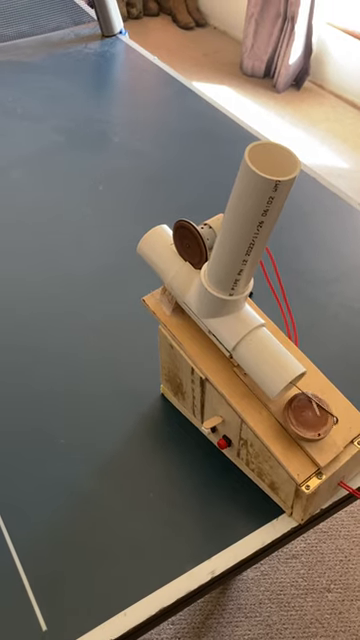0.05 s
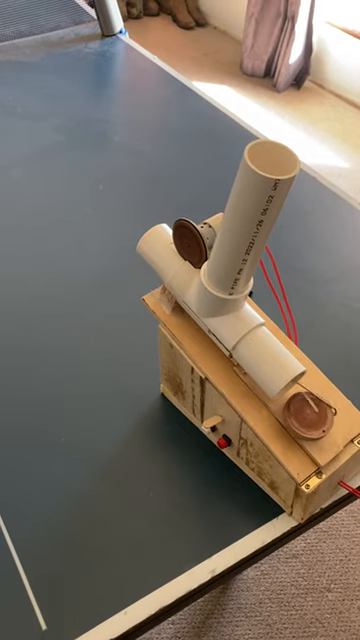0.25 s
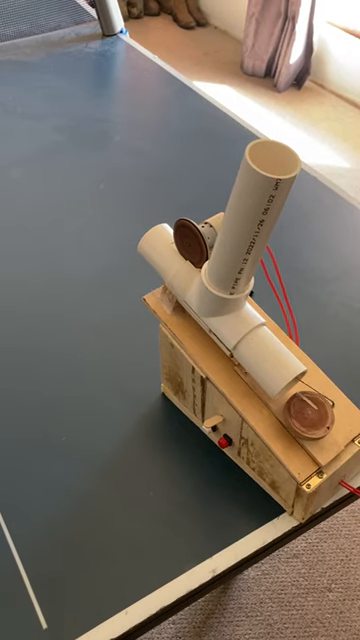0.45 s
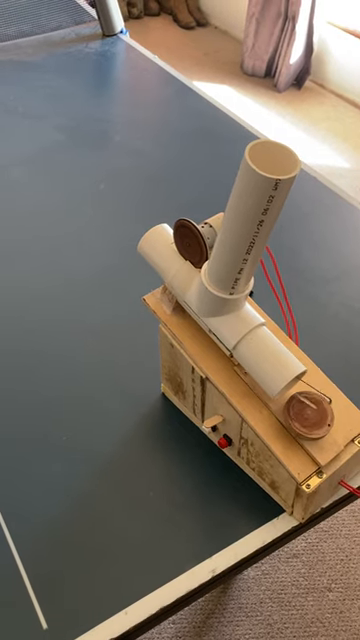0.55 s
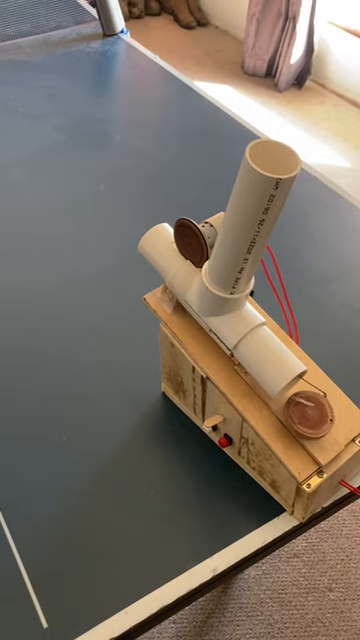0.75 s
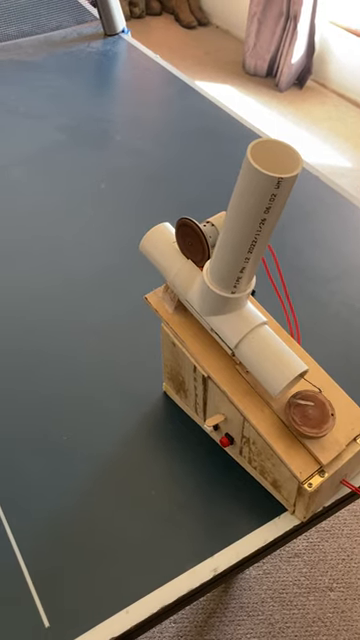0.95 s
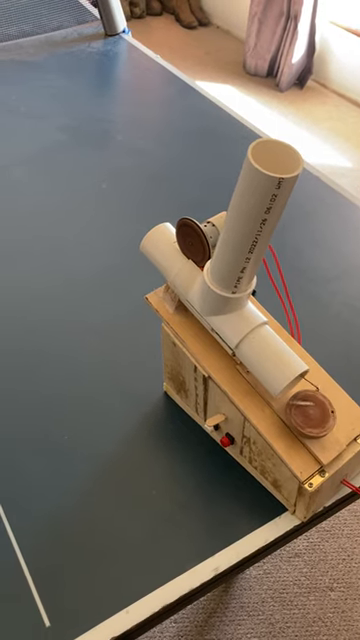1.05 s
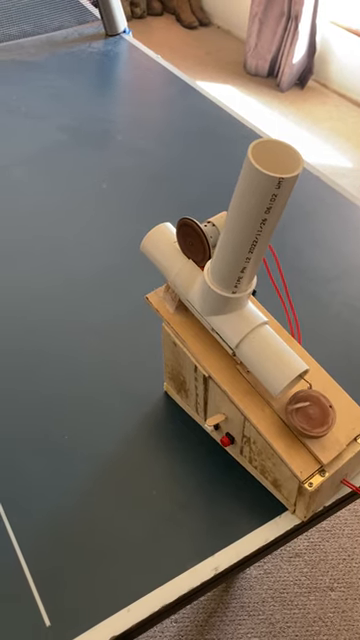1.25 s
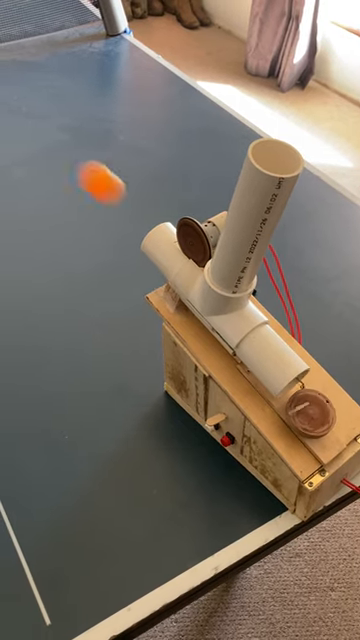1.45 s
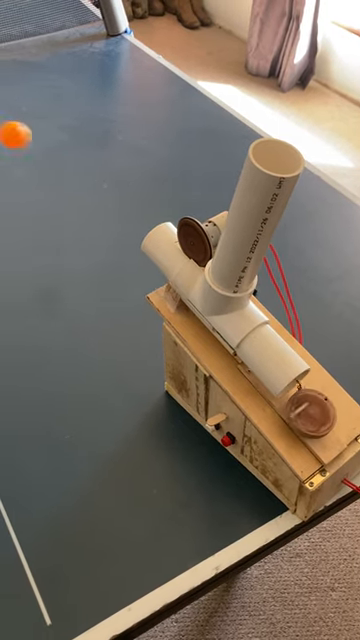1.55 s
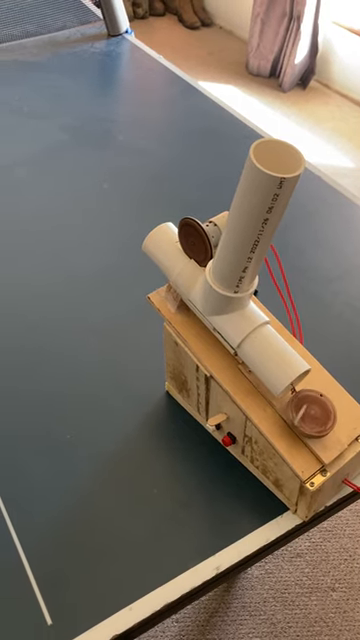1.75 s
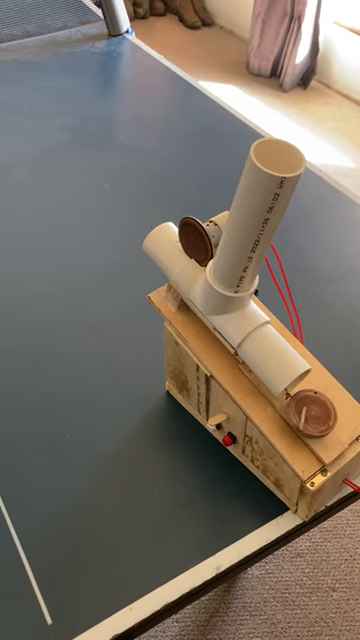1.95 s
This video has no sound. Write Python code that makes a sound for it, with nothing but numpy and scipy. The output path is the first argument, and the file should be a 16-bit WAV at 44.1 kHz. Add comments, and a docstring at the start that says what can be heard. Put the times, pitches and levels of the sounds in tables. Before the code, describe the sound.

A small ball launcher's motor hums and whines, then a ball pops out and bounces.

```python
"""At a table-tennis table, close to a small home-made ball launcher. Its unbalanced wheel drives a hum
in the wooden box; the motor whines at multiples of the shaft rate over a rushing noise. A ball bouncing
about the room makes wooden knocks and light ticks. Another is fired with a pop that slows the wheel, and
bounces once on the table. The impacts ring on in the room; a phone's two microphone ports pick it up."""
import sys
import numpy as np
from scipy import signal
from scipy.fft import rfft, irfft, next_fast_len
from scipy.io import wavfile

SR = 44100
rng = np.random.default_rng(int(sys.argv[2]) if len(sys.argv) > 2 else 0)


def master(y):
    """Save y as 16-bit WAV."""
    cut = np.clip(np.atleast_2d(y).T, -1, 1)
    pcm = np.round(cut * 32767)  # scale
    wavfile.write(sys.argv[1], SR, pcm.astype(np.int16))


N = 88200

# table-top modes: f/Hz, width/Hz, relative level/dB
TABLE_MODES = [(290, 82, -1), (405, 75, -2), (537, 64, -5), (785, 110, -6.5), (1044, 185, -9.5),
               (1680, 120, -3)]
# decay of struck wood: f/Hz, t60/s
WOOD_DECAY = [(200, 0.39), (1000, 0.43), (2500, 0.3)]
SIDE = np.array([[.5], [-.5]])  # left and right share of a difference


def amp(db):
    return 10 ** (np.asarray(db) / 20)


def unit_rms(x):
    return x / np.sqrt(np.mean(x ** 2) + 1e-20)


def along(points, hz):
    """Interpolate (f/Hz, value) points on a log axis."""
    f, values = np.transpose(points)
    return np.interp(np.log(hz + 1), np.log(f + 1), values)


def filtered(x, response):
    """Apply a complex frequency response."""
    size = next_fast_len(x.shape[-1] + SR // 2)
    return irfft(rfft(x, size) * response(np.fft.rfftfreq(size, 1 / SR)), size)[..., :x.shape[-1]]


def resonances(modes):
    """Causal response of modes (f/Hz, width/Hz, level/dB), alternating in sign."""
    return lambda f: sum((-1) ** k * amp(db) * 1j * f * width / (hz * hz - f * f + 1j * f * width)
                         for k, (hz, width, db) in enumerate(modes))


def noise_pair(coherence, length):
    """Left and right noise with a given coherence per frequency."""
    def weights(hz):
        angle = np.arccos(np.clip(along(coherence, hz), -1, 1)) / 2
        return np.array([np.cos(angle), np.sin(angle)])
    mid, side = filtered(rng.standard_normal((2, length)), weights)
    return np.array([mid + side, mid - side])


def decayed(noise, decay):
    """Fade each band at its own rate (f/Hz, t60/s)."""
    hz, t, bands = signal.stft(noise, SR, nperseg=256)
    fade = amp(-60 * t / along(decay, hz)[:, None])
    return signal.istft(bands * fade, SR, nperseg=256)[1][..., :noise.shape[-1]]


def add(track, at_s, sound):
    part = track[:, round(at_s * SR):][:, :sound.shape[-1]]
    part += sound[..., :part.shape[-1]]


def burst(response, rise_s, t60_s):
    """Coloured noise: linear rise, exponential decay."""
    t = np.arange(SR // 8) / SR
    noise = unit_rms(filtered(rng.standard_normal(len(t)), response))
    return noise * np.minimum(t / rise_s, 1) * amp(-60 * np.maximum(t - rise_s, 0) / t60_s)


def wood_knock(modes, decay, tilt_db_oct, rise_s=0.0051):
    """A blow on wood: noise in its modes, dying by band."""
    # left-right likeness of the wood's sound: f/Hz, coherence
    coherence = [(350, 0.99), (600, 0.075), (1500, 0.068), (2500, 0.46)]
    low_hz, top_hz = 125, 2510
    t = np.arange(SR // 2) / SR

    def colour(f):
        tilt = amp(tilt_db_oct * np.log2(np.minimum(f + 1, top_hz / 2) / 400))
        rolloff = (1 + 1j * f / top_hz) ** 3 * (1 + low_hz / (1j * f + 1)) ** 3
        return resonances(modes)(f) * tilt / rolloff
    noise = unit_rms(filtered(noise_pair(coherence, len(t)), colour))
    return decayed(noise, decay) * np.minimum(t / rise_s, 1)


def room(x):
    """Diffuse tail of a furnished room."""
    # reverberation: f/Hz, t60/s
    decay = [(300, 0.4), (1500, 0.52), (5000, 0.27), (12000, 0.42)]
    # left-right likeness of the tail: f/Hz, coherence
    coherence = [(350, 0.93), (700, 0.057), (3000, 0.2), (6000, 1)]
    tail = decayed(noise_pair(coherence, SR // 2), decay)
    delayed = np.pad(x.mean(0), (300, 0))[None]
    return signal.fftconvolve(delayed, tail / np.linalg.norm(tail[0]), axes=1)[:, :N]


def rush(shaft_rad):
    """Rushing noise that beats once a turn."""
    # noise spectrum: f/Hz, relative density/dB
    spectrum = [(25, -36), (65, -15.5), (100, -13), (330, -24.5), (600, -29.5), (2300, -30), (2800, -36),
                (3500, -34), (4300, -40), (5200, -36), (7300, -42), (8300, -31), (9200, -37), (14300, -37),
                (16000, -55)]
    # left-right likeness: f/Hz, coherence
    coherence = [(60, 0.8), (300, 1), (700, 0.033), (2000, 0.89), (4000, 0.28), (6000, 1)]
    beating = noise_pair(coherence, N) * (1 + 0.15 * np.sin(shaft_rad))
    return amp(-48.5) * unit_rms(filtered(beating, lambda f: amp(along(spectrum, f))))


def whine(shaft_rad, shaft_hz, mean_hz):
    """Wavering shaft orders; five commutator bars lift every fifth."""
    # envelope of the orders: f/Hz, level/dB
    envelope = [(200, -74.5), (1500, -70), (2800, -72), (4200, -69), (5500, -58), (7200, -72),
                (8600, -69.5), (10000, -73), (13500, -66.5), (15000, -80)]
    # prominent orders: order, level/dB at each of speeds_hz
    prominent = [(5, -67.5, -62, -62), (20, -59, -60, -72), (25, -64, -62, -60), (43, -68, -57, -57),
                 (44, -64, -59, -56), (45, -50, -54, -53), (46, -62, -54, -53), (47, -58, -57, -58),
                 (50, -53, -52, -50), (53, -70, -60, -59), (55, -57, -57, -55), (56, -50, -51, -55),
                 (60, -70, -62, -60), (70, -72, -63, -55)]
    # shaft rate when slowed, running up, at full speed: f/Hz
    speeds_hz = [112, 114.8, 116.3]
    # left-right phase scatter from the room: f/Hz, deviation/rad
    spread = [(400, 0.2), (1000, 1.78), (5500, 0.4), (7000, 0.06)]
    bars_db, scatter_db, waver_db = 3.5, 3.5, 4.5
    scatter_rad = 1.6  # small = one crisp pulse a turn
    orders = np.arange(2, 140)
    count, order_hz = len(orders), orders * mean_hz
    smooth_db = along(envelope, order_hz) + bars_db * (orders % 5 == 0)
    levels_db = list(smooth_db + scatter_db * rng.standard_normal(count))
    for order, *db_at_speed in prominent:
        levels_db[order - orders[0]] = np.interp(shaft_hz, speeds_hz, db_at_speed)
    wavers = rng.standard_normal((count, 24))
    common_rad = scatter_rad * rng.standard_normal(count)
    phases_rad = common_rad + SIDE * along(spread, order_hz) * rng.standard_normal(count)
    x = np.zeros((2, N))
    for order, db, knots, phase in zip(orders, levels_db, wavers, phases_rad.T):
        waver = np.interp(np.linspace(0, 23, N), np.arange(24), knots)
        x += amp(db + waver_db * waver) * np.sin(order * shaft_rad + phase[:, None])
    return x


def box_hum(shaft_rad):
    """The unbalanced wheel drives one resonance of the box."""
    box_hz, width_hz, on_resonance_db = 116.68, 3.77, -34.5
    return filtered(np.sqrt(2) * np.sin(shaft_rad), resonances([(box_hz, width_hz, on_resonance_db)]))


def motor():
    """Hum, whine and rush follow the wheel; one steady tone does not."""
    # shaft rate, dipping at the shot: t/s, f/Hz
    shaft = [(0, 114.2), (0.45, 115.2), (0.952, 115.9), (1.411, 116.6), (1.426, 110.4), (1.7, 111.3),
             (2, 113.2)]
    settle = SR // 2  # samples before t = 0 for the hum to build up
    times_s, rates_hz = np.transpose(shaft)
    shaft_hz = np.interp(np.arange(-settle, N) / SR, times_s, rates_hz)
    shaft_rad = 2 * np.pi * np.cumsum(shaft_hz) / SR
    hum = box_hum(shaft_rad)[settle:]
    shaft_rad, shaft_hz = shaft_rad[settle:], shaft_hz[settle:]
    tone = amp(-54.5) * np.sin(2 * np.pi * 1960 * np.arange(N) / SR)
    return hum + tone + whine(shaft_rad, shaft_hz, rates_hz.mean()) + rush(shaft_rad)


def knocks_and_ticks():
    """Wooden knocks and light shell ticks of a ball bouncing about the room."""
    # blows on wood: t/s, relative level/dB, tilt/(dB/octave), t60 factor
    knocks = [(0.199, -21.5, 7.5, 1.21), (.212, -15, 0.5, 1.17), (.465, -31, 4.5, 0.8),
              (.492, -31.5, 2.5, 0.53), (.552, -29.5, 5, 0.57), (0.591, -26.5, -5, 0.61),
              (.692, -35.5, -3, 0.37), (.706, -37, 11, 0.31)]
    # modes of the struck wood: f/Hz, width/Hz, relative level/dB
    wood_modes = [(188, 39, 16), (261, 11, 1), (282, 45, 8.5), (363, 6, -1), (759, 58, -3.5), (996, 92, -1),
                  (1096, 190, -5.5), (1540, 430, -17.5)]
    # shell ticks: t/s, relative level/dB, f/Hz, upper mode re that mode/dB
    ticks = [(0.2036, -29, 10470, 8), (0.4625, -34.5, 8500, -3), (0.5029, -35.5, 8300, 1),
             (0.568, -38, 8240, -5), (0.709, -35, 8400, 4), (0.851, -40.5, 8300, -4),
             (0.963, -39.5, 8250, 5), (1.443, -30.5, 8400, -8), (1.9047, -38.5, 6680, -15)]
    upper_hz, width_hz = 10460, 330
    x = np.zeros((2, N))
    for at_s, db, tilt_db_oct, t60_factor in knocks:
        decay = np.multiply(WOOD_DECAY, [1, t60_factor])
        add(x, at_s, amp(db - 4.5) * wood_knock(wood_modes, decay, tilt_db_oct))
    for at_s, db, hz, upper_db in ticks:
        shell = resonances([(hz, width_hz, 0), (upper_hz, width_hz, upper_db)])
        add(x, at_s, amp(db - 5) * burst(shell, rise_s=0.00026, t60_s=0.084))
    return x


def bounce(at_s):
    """The fired ball lands on the table: a crack and the boards' thud."""
    # crack spectrum: f/Hz, relative density/dB
    crack = [(800, -13.5), (1700, -2), (2500, -4.5), (3500, -2.5), (4700, 5), (5900, -2), (6700, -17),
             (9500, -6), (12500, -1.5), (16300, -24)]
    x = np.zeros((2, N))
    add(x, at_s, amp(-14.5) * burst(lambda f: amp(along(crack, f)), rise_s=0.001, t60_s=0.023))
    add(x, at_s, amp(-27.5) * wood_knock(TABLE_MODES, WOOD_DECAY, tilt_db_oct=0, rise_s=0.0035))
    return x


def pop(at_s):
    """A ball scrapes into the wheel; the tube rings under a hiss, the box recoils, far walls echo."""
    # tube modes: f/Hz, relative level/dB, t60/s
    tube_modes = [(919, -3.5, 0.022), (1135, -11.5, 0.013), (1350, -16, 0.013), (1665, -1, 0.012),
                  (2267, -14.5, 0.03), (2465, -15.5, 0.015)]
    # hiss spectrum: f/Hz, relative density/dB
    hiss_spectrum = [(1500, -11), (2900, -1.5), (5000, -6), (7500, -6.5), (9800, 0), (11700, -6),
                     (15000, -13), (16300, -40)]
    # wall echoes: delay/s, gain/dB
    echoes = [(.031, -31), (.11, -26)]
    rise_s, scrape_s, noise_t60_s = 0.006, 0.012, 0.031
    t = np.arange(SR // 8) / SR
    swell = np.sin(np.pi / 2 * np.minimum(t / rise_s, 1)) ** 2
    age_s = t - rise_s
    modes = sum(amp(db - 60 * np.maximum(age_s, 0) / t60_s) * np.sin(2 * np.pi * hz * age_s + 1)
                for hz, db, t60_s in tube_modes)
    ring = amp(-7.5) * swell * modes
    hiss = amp(-17.5) * burst(lambda f: amp(along(hiss_spectrum, f)), rise_s, noise_t60_s)
    recoil = amp(-35.5) * wood_knock(TABLE_MODES, WOOD_DECAY, tilt_db_oct=1)
    broad_tube = resonances([(hz, hz / 4, db) for hz, db, _ in tube_modes])
    scrape = amp(-30.5) * burst(broad_tube, scrape_s, noise_t60_s)
    x = np.zeros((2, N))
    add(x, at_s - scrape_s, scrape)
    add(x, at_s, ring + hiss)
    add(x, at_s + rise_s, recoil)
    for delay_s, db in echoes:
        smear = rng.standard_normal(SR // 50) * np.hanning(SR // 50)
        add(x, at_s + delay_s, amp(db) * signal.fftconvolve(ring, smear / np.linalg.norm(smear)))
    return x


def scene():
    """Stray ball, shot and bounce in the room, over the running motor."""
    # tube mouth off to one side: f/Hz, left lead/rad
    mouth_lead = [(500, -0.045), (700, -0.85), (1800, -1.76), (2300, -1.03), (5000, -0.58)]
    shot, stray, landing = pop(at_s=1.4105), knocks_and_ticks(), bounce(at_s=1.6975)
    shot_aside = filtered(shot, lambda f: np.exp(1j * SIDE * along(mouth_lead, f)))
    direct = motor() + stray + shot_aside + landing
    return direct + amp(-10) * (room(shot) + room(stray)) + amp(-8) * room(landing)


def record(dry):
    """Soft peak ceiling, then two band-limited phone ports that differ in phase and level."""
    # phase between the ports: f/Hz, left lead/rad
    port_lead = [(550, 0), (1700, .9), (2700, 3.1), (4050, 3.5), (4250, .1), (4640, 3), (5200, 3.14),
                 (8400, 6.28), (11700, 9.42), (14900, 12.57)]
    # port imbalance: f/Hz, level/dB added left and taken from right
    port_tilt = [(100, 0.81), (800, 0.95), (1500, 0)]
    top_hz = 16450
    lead_hz, lead_rad = np.transpose(port_lead)

    def ports(hz):
        phase = np.exp(1j * SIDE * np.interp(hz, lead_hz, lead_rad))
        return phase * amp(2 * SIDE * along(port_tilt, hz)) * (hz < top_hz)
    limited = dry / np.sqrt(np.hypot(1, dry ** 2))
    return filtered(limited, ports)


dry = scene()
out = record(dry)
master(out)
```